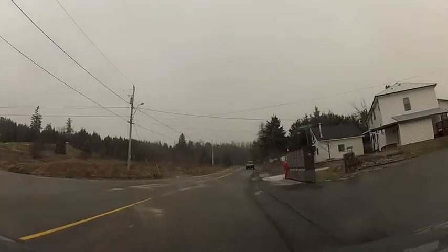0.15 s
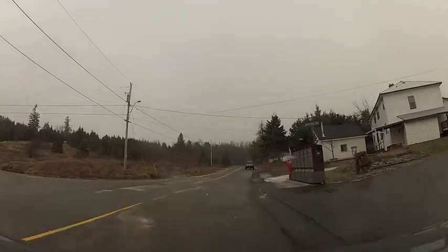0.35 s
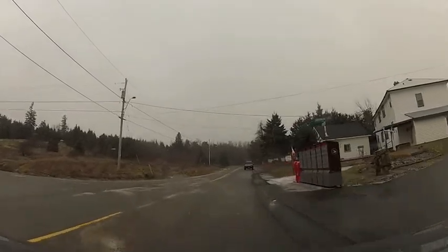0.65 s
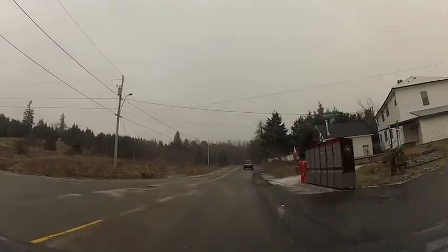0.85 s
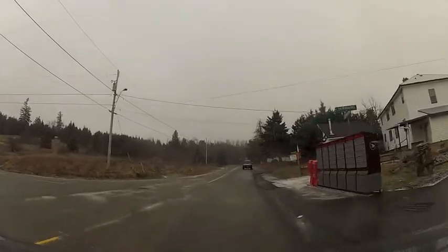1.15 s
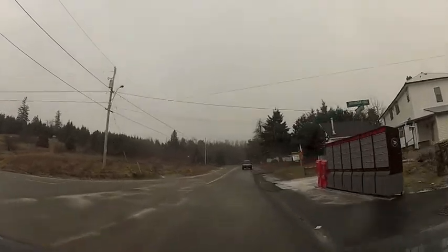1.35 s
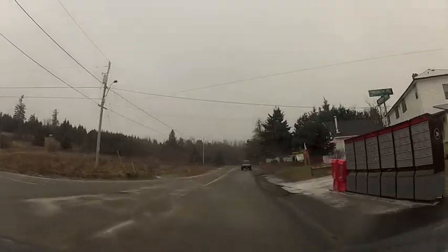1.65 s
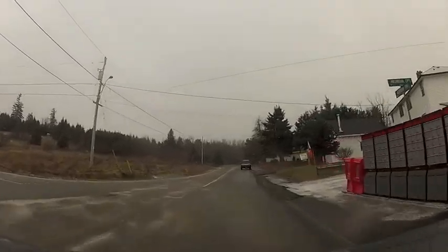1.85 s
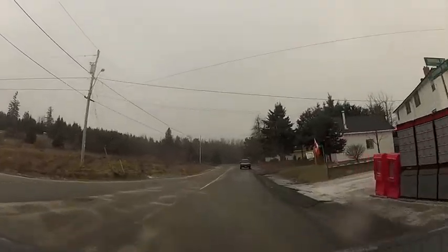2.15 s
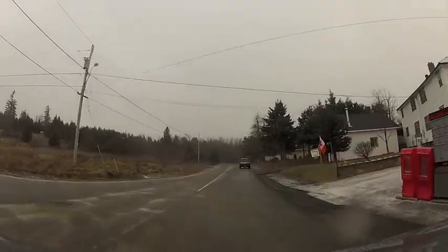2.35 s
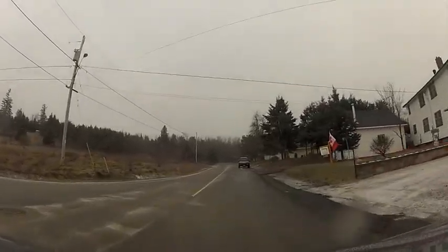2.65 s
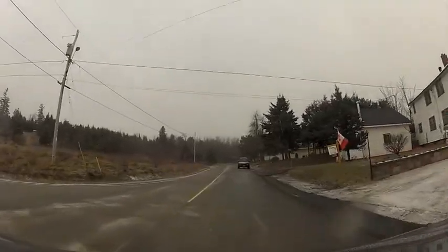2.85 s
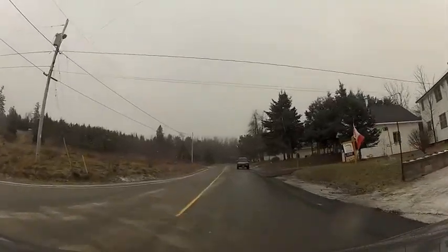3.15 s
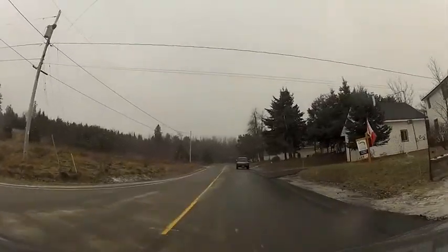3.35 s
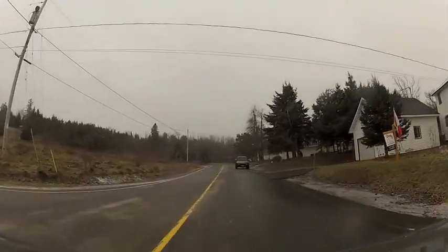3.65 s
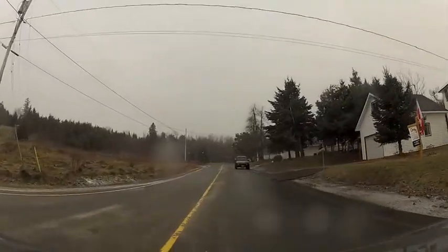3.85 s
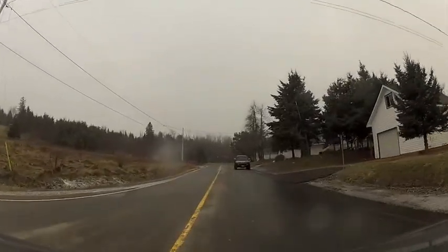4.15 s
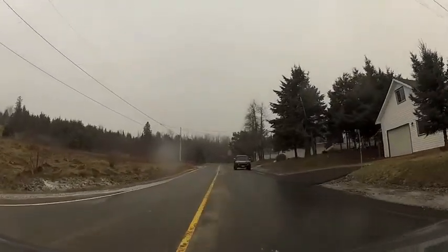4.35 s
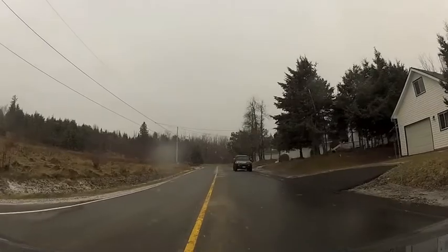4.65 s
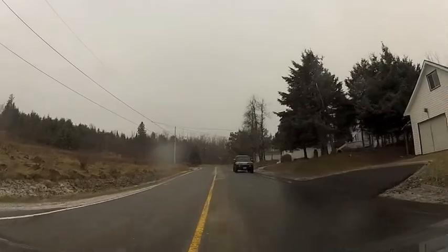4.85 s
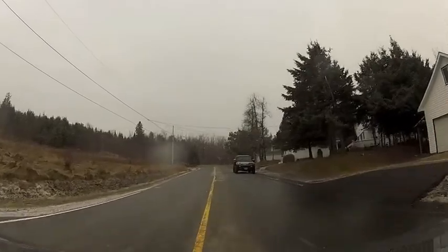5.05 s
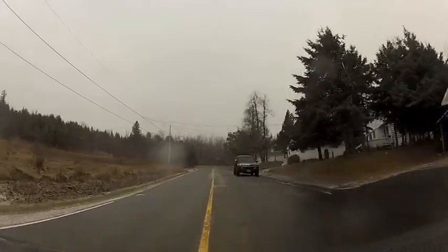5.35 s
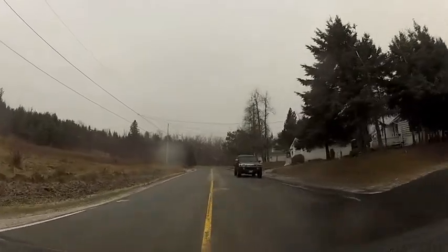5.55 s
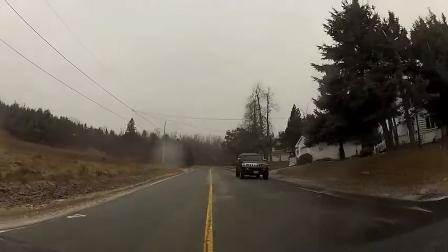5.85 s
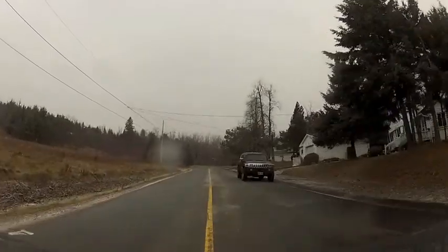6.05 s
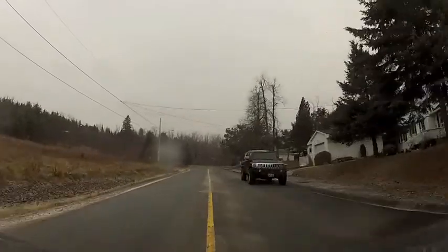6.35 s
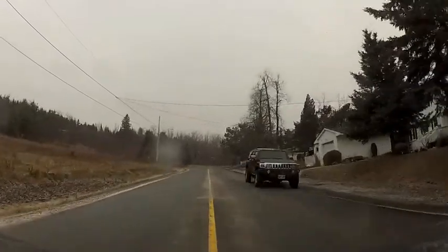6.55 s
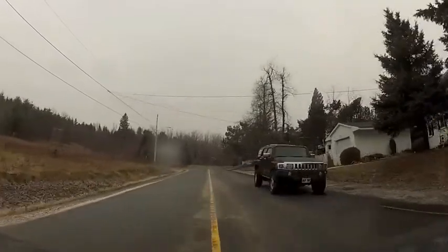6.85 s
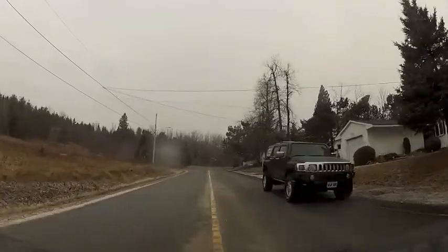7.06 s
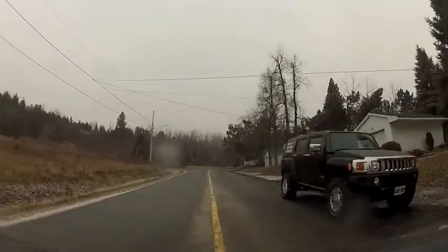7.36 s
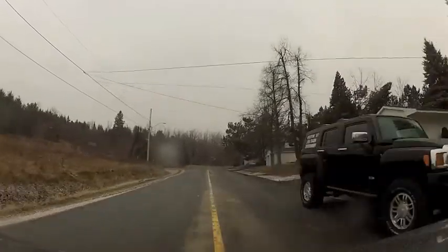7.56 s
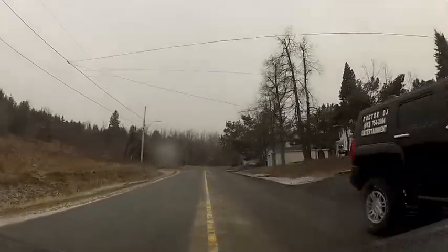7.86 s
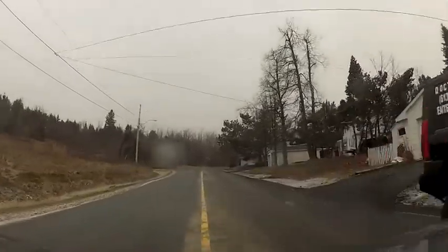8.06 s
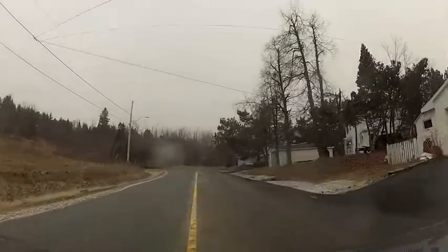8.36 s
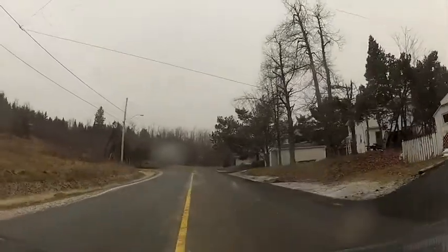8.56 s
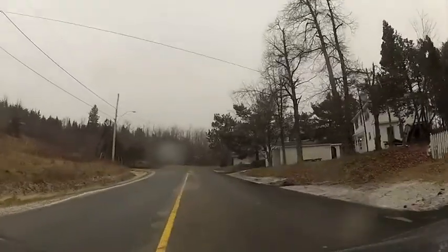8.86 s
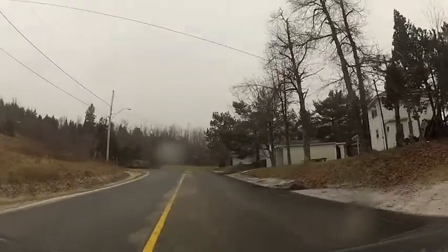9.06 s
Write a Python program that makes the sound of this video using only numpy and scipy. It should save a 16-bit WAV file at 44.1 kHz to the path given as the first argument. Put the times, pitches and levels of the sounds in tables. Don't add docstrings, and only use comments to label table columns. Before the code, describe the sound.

A close, lo-fi microphone in a case on a car's hood hears the engine in light rain on a wet road. For the first second the engine throbs low and quiet over rumbling body shake, with small rain ticks. Around 1 s the throttle opens and the pitch climbs quickly, booming through the metal until about 2.1 s. At 2.3 s a gear change brings a brief jolt and a sharp fall in pitch. From 2.6 s the engine climbs more slowly, growing fuller, and by about 5.5 s settles into a steady, heavy drone with rattling metallic clatter that lasts to the end at 9.2 s. Soft wet tyre hiss grows with speed, and bumps thud low near 4.2 and 6 s. Crisp drops tap the case throughout, a hard one at 4.7 s, then denser and louder from 7 s, especially 8 to 9 s. Treble is grainy and brittle.

```python
import sys
import numpy as np
from scipy import signal
from scipy.fft import rfft, irfft, next_fast_len
from scipy.io import wavfile
from scipy.ndimage import uniform_filter1d, map_coordinates

SR = 44100
rng = np.random.default_rng(int(sys.argv[2]) if len(sys.argv) > 2 else 0)


def unload_wav(signal):
    wavfile.write(
        sys.argv[1],
        SR,
        np.round(np.clip(np.atleast_2d(signal).T, -1, 1) * 32767).astype(np.int16),
    )


def undo_db(level):
    steps = np.asarray(level, float) / 20
    return 10 ** steps


N = 406602


def unit(x):
    return x / np.sqrt(np.mean(x ** 2) + 1e-20)


def noise():
    return rng.standard_normal(N)


def along(points, hz):
    f, v = np.transpose(points)
    return np.interp(np.log(hz + 1), np.log(f + 1), v)


def curves(rows):
    s, *columns = np.transpose(rows)
    return [np.interp(np.arange(N) / SR, s, column) for column in columns]


def wobble(rate):
    knots = rng.standard_normal(int(N * rate / SR) + 4)
    return map_coordinates(knots, [np.arange(N) * rate / SR])


def swells(rows):
    t = np.arange(N) / SR
    return sum(db * np.exp(-.5 * ((t - s) / half) ** 2) for s, half, db in rows)


def filtered(x, response):
    m = next_fast_len(N + SR // 2)
    return irfft(rfft(x, m) * response(np.fft.rfftfreq(m, 1 / SR)), m)[..., :N]


def coloured(x, spectrum):
    return filtered(x, lambda hz: undo_db(along(spectrum, hz)))


def resonate(x, table):
    def response(f):
        return np.sqrt(sum(undo_db(2 * db) / (1 + (2 * (f - c) / w) ** 2) ** 1.63 for c, w, db in table))
    return unit(filtered(x, response))


# time in seconds, firing rate in Hz.
SPEED = [(0, 27.6), (1.0, 27.6), (1.15, 36.4), (1.35, 40.9), (1.8, 51.3), (2.05, 54.1), (2.19, 51.6),
         (2.34, 41.6), (2.41, 38.1), (2.5, 37.2), (2.61, 39), (2.86, 40.7), (3.73, 48.5), (4.07, 51.2),
         (4.81, 55.3), (5.64, 56.7), (6.95, 55.45), (9.22, 55.5)]


def crank():
    return np.cumsum(uniform_filter1d(curves(SPEED)[0], size=SR // 10, mode="nearest")) / SR


# time in seconds, engine bay roar in dB, throttle in dB.
LOAD = [(0, -39, -24), (.93, -39, -14), (1.05, -33.5, 1), (1.16, -35.5, -8), (1.45, -33.5, 4),
        (1.9, -31, 1), (2.12, -31, 6.5), (2.28, -31.5, -4), (2.55, -32, 0), (2.9, -32.5, 7),
        (3.6, -30.5, -3.5), (4.1, -30.5, 0), (4.55, -29, 5), (5.1, -31, 1), (5.5, -30, -13),
        (6.3, -32, -7.5), (7.0, -31.5, -0.5), (9.22, -31.5, -1)]


def load_db():
    return curves(LOAD)


# time in seconds, half length in seconds, swell in dB.
SHIFT = (2.262, 0.03, 3.5)


def jolt_db():
    return swells([SHIFT])


# Hz, level in dB.
BODY = [
    [(27, -37), (36.5, -35), (39, -28), (41, -22), (47.5, -23), (51, -18), (54, -18.5), (56.5, -15)],
    [(55, -40), (73, -25), (78, -24.5), (83, -27.5), (88, -25), (95, -24), (102, -39.5), (112, -35.5)],
    [(83, -32.5), (110, -36), (122, -40), (142, -40), (150, -36), (157, -33), (164, -33.5), (170, -38)],
]
THROTTLE_SHARE = [0.039, 0.051, 0.29]
# Hz, level in dB.
FLOORPAN = [(100, -14), (165, -8.5), (212, -1), (236, -4.5), (258, -2), (290, -11.5), (318, -9), (336, -15),
            (385, -24)]
# time in seconds, half length in seconds, firing tone change in dB.
SURGES = [
    (1.2, 0.23, -5),
    (2.27, 0.034, 6.5),
    (2.52, 0.061, -6),
    (2.75, .06, 2),
    (4.12, .08, 0),
    (4.5, 0.07, 2),
]


def boom():
    upper_db = -39.5
    thin_db_per_hz = 0.33
    throttle_db = load_db()[1]
    turns = crank()
    rate_hz = SR * np.gradient(turns)
    below_cruise_hz = SPEED[-1][1] - rate_hz
    jolt = 0.26 * jolt_db()
    total = np.zeros(N)
    for order in range(1, 8):
        above_first = order - 1
        if order <= 3:
            level_db = along(BODY[above_first], order * rate_hz) + THROTTLE_SHARE[above_first] * throttle_db
        else:
            thinning_db = (0.51 + thin_db_per_hz * below_cruise_hz) * (order - 4)
            level_db = upper_db + throttle_db - thinning_db + along(FLOORPAN, order * rate_hz)
        if order == 1:
            level_db = level_db + swells(SURGES)
        level_db = uniform_filter1d(level_db, size=SR // 25, mode="nearest") + jolt
        flicker_db = (.5 + .15 * above_first) * wobble(7)
        tone = np.sin(order * 2 * np.pi * turns - 0.91 * above_first ** 2)
        total += np.sqrt(2) * undo_db(level_db + flicker_db) * tone
    return total


# multiple of firing rate, dB over the other quarter orders.
ORDERS_DB = [(4.5, 1.5), (5.75, 16), (7.25, -3), (7.5, 5.5), (8, 5.5), (9, 9), (9.75, 12), (10, 17),
             (11, 16), (11.25, 0), (12, 18), (14, 12.5), (16, 13), (16.25, 8.5), (17, 9), (19, 6.5),
             (20, 13), (20.75, 6.5), (22, 10.5), (23, 15), (24, 8.5), (25, 3)]


def clatter(turns):
    level_db = 2.0 + 4.7 * rng.standard_normal(4 * 32)
    level_db[:17] = -60
    for order, db in ORDERS_DB:
        level_db[round(4 * order)] = db
    phase = 2 * np.pi * rng.random(len(level_db))
    cycle = irfft(undo_db(level_db) * np.exp(1j * phase), 4096)
    return unit(np.interp(turns / 4 % 1, np.arange(4096) / 4096, cycle, period=1))


CYLINDERS = [-2, -11, -5, -7.5]
# Hz, width in Hz, level in dB.
BAY_MODES = [(158, 85, -0.5), (219.7, 14, 1), (245, 31, -6), (291, 36, -21), (428, 57, -10.5),
             (505.4, 45, 0), (547, 105, -3), (626, 50, -2.5), (702, 86, -0.5), (761, 43, 2), (817, 67, -4),
             (878.5, 27.5, 2), (939, 33, -1.5)]
# Hz, width in Hz, level in dB.
HIGH_MODES = [(1050, 108, -1.5), (1177, 66, -2.5), (1298, 60, 1), (1390, 57, -3), (1455, 95, -5),
              (1618, 140, -11)]
# Hz, width in Hz, level in dB.
WHIRR = [(932, 45, 6), (956, 20, -3)]


def engine_bay():
    turns = crank() + 0.0026 * wobble(25)
    roar_db, throttle_db = load_db()
    strength = undo_db(np.take(CYLINDERS, turns.astype(int) % 4))
    gas = (1 + 0.81 * strength * np.exp(-3.2 * (turns % 1))) * noise()
    blows = clatter(turns)
    clean = np.clip((curves(SPEED)[0] - 17) / 75, 0, 1)

    def ringing(table, share):
        return np.sqrt(share) * resonate(blows, table) + np.sqrt(1 - share) * resonate(gas, table)

    hood = ringing(BAY_MODES, clean)
    block = undo_db(-13.5 + 0.12 * throttle_db) * ringing(HIGH_MODES, 0.75 * clean)
    whirr = undo_db(-49.5) * resonate(noise(), WHIRR)
    return undo_db(roar_db + jolt_db() + 0.5) * (hood + block) + whirr


# Hz, level in dB per Hz.
SHAKE = [(10, -50), (19, -11), (28, -25), (42, -1.5), (60, -10), (69, 1), (76, 4), (84, 1.5), (93, -9.5),
         (104, -17.5), (148, -17.5), (200, -45), (340, -34), (900, -120)]
# time in seconds, half length in seconds, added shake in dB.
ROUGH_ROAD = [(0, 0.38, 4), (2.303, 0.16, 3.5), (2.997, 0.42, 2), (4.22, 0.036, 8.5), (4.75, 0.1, 3.5),
              (5.7, 0.27, 3.5), (6.003, 0.054, 7), (6.4, 0.27, 3), (7.15, .2, 4.5), (7.7, 0.12, 3.5),
              (8.55, .12, 3.5), (8.8, .1, 3.5), (9.08, 0.08, 5)]
# time in seconds, level in dB.
ROAD = [
    (0.0, -59),
    (0.72, -60.5),
    (1.74, -50.5),
    (2.52, -52.5),
    (4.36, -48),
    (5.55, -47),
    (6.37, -49.5),
    (6.96, -48),
    (9.22, -49),
]
# Hz, level in dB per Hz.
HISS = [(1000, -50), (1500, -14), (1750, 3.5), (1900, 2), (2300, -7), (2900, -15), (3100, -16), (3450, -9),
        (3700, -23), (4400, -41)]


def road():
    shake_db = -32.5 + swells(ROUGH_ROAD)
    shake = unit(coloured(noise(), SHAKE))
    power = abs(uniform_filter1d(shake ** 2, size=SR // 6))
    shake /= np.sqrt(power + .05) ** 0.77
    hiss = undo_db(curves(ROAD)[0] + 0.99 * wobble(30)) * unit(coloured(noise(), HISS))
    return undo_db(shake_db + 2.04) * unit(shake) + hiss


# time in seconds, half length in seconds, drop level change in dB.
SQUALLS = [
    (.2, .2, 6),
    (.62, 0.072, -4),
    (2.6, 0.17, -1.5),
    (3.95, 0.11, 6),
    (5.69, .08, -14),
    (6.06, 0.11, 5),
    (7.1, 0.12, 3.5),
    (8.8, 0.08, 7.5),
]


def unplaced_drops():
    when, soft, pitch = rng.random((1000, 3)).T
    faint = np.c_[when * N / SR, -50 + 11 * when ** .5 - 16 * soft ** .7, 1750 + 1900 * pitch ** 1.5]
    when, soft, pitch = rng.random((110, 3)).T
    pace_db = np.interp(when * N / SR, *np.transpose(ROAD)) - ROAD[-1][1]
    stray_db = -35 + 1.6 * pace_db - 8 * soft
    stray = np.c_[when * N / SR, stray_db, 1800 + 1700 * pitch ** 2.5]
    drops = np.r_[stray, faint]
    drops[:, 1] += swells(SQUALLS)[(drops[:, 0] * SR).astype(int)]
    return drops


# time in seconds, peak in dB, ring in Hz.
EARLY_DROPS = [(0.0093, -38, 1650), (0.0723, -39, 3570), (0.2105, -39, 3230), (0.3119, -36, 1870),
               (0.3431, -41, 2630), (0.4305, -34, 2390), (0.5137, -39, 1720), (0.7593, -34, 2700),
               (0.8009, -41, 3450), (0.8993, -47, 1960), (0.9544, -28.5, 2400), (0.9917, -38, 2710),
               (1.3202, -32.5, 2020), (1.38, -33, 1710), (1.47, -35, 2350), (1.8358, -33, 2170),
               (1.8579, -34, 2000), (1.897, -31, 2870), (2.2282, -35, 2000), (2.4635, -37.5, 2000),
               (2.5917, -38, 2280), (2.9101, -30, 3470), (3.1711, -29, 2190), (3.2018, -40, 2000),
               (3.3549, -36, 2150), (3.5917, -38, 2020), (3.7414, -35, 2370)]
# time in seconds, peak in dB, ring in Hz.
DROPS = [(3.876, -25.5, 1870), (4.0528, -35.5, 1980), (4.1587, -31, 2000), (4.49, -30, 1980),
         (4.541, -33, 2130), (4.7186, -17.5, 2020), (4.8065, -29.5, 2020), (4.98, -26, 2050),
         (5.121, -30, 2020), (5.1524, -29.5, 2070), (5.5595, -25, 1990), (5.8097, -41, 2070),
         (5.9293, -24.5, 2000), (6.02, -27, 2020), (6.1192, -33, 1960), (6.175, -27, 2110),
         (6.5123, -27, 1600), (6.6043, -30, 2070), (7.1024, -23, 1950), (7.1525, -32, 2070),
         (7.287, -29, 1950), (7.417, -30.5, 2150), (7.721, -26, 2050), (7.918, -26, 1730),
         (8.0788, -22, 2030), (8.3087, -23.5, 1920), (8.4052, -22.5, 1950), (8.477, -28, 2020),
         (8.6449, -18.5, 2000), (8.8655, -21.5, 2020)]
# time in seconds, peak in dB, ring in Hz.
RIM_DROPS = [(4.1144, -32, 2700), (4.2218, -28, 2880), (4.9227, -37, 2650), (5.2737, -34.5, 2820),
             (5.3876, -33, 2330), (5.5016, -36, 3470), (5.9826, -39, 3470), (6.0086, -28, 2390),
             (6.097, -30, 2370), (6.129, -33, 2870), (6.525, -31, 3400), (6.8516, -33, 3500),
             (6.971, -33, 2290), (7.0948, -27, 2450), (7.1059, -25.5, 2770), (7.5182, -33, 2300),
             (7.6832, -34, 2920), (7.7688, -29, 2230), (7.8006, -28.5, 3600), (8.0508, -31, 3450),
             (8.091, -26, 2130), (8.1553, -29, 3490), (8.2783, -26, 2330), (8.4136, -35, 3290),
             (8.7472, -25.5, 2250), (8.7795, -32, 2370), (8.9125, -33, 3270), (9.0888, -31, 2070),
             (9.1076, -32, 2710)]
# Hz, level in dB per Hz.
CASE = [(600, -65), (1300, -0.5), (1900, 5), (2600, 7.5), (3050, 1.5), (3450, 7), (3800, -2.5), (4400, -67)]


def rain():
    s, db, hz = np.r_[EARLY_DROPS, DROPS, RIM_DROPS, unplaced_drops()].T[..., None]
    t = np.arange(SR // 60) / SR

    def decay(t60_s):
        return undo_db(-60 * t / t60_s)

    ring = np.sin(2 * np.pi * hz * t) * decay(0.0073) * undo_db(-0.88 * along(CASE, hz))
    splash = rng.standard_normal((len(s), len(t))) * (.5 * decay(.006) + .2 * decay(.03))
    splash = splash * undo_db(-.3 * (db + 36))
    snap = 0.75 * decay(0.0017) * np.cos(2 * np.pi * 1.096 * hz * t)
    tap = (1 - np.exp(-t / .0003)) * (ring + splash) + snap
    start = np.round((s - .0002) * SR).astype(int).clip(0)
    at = (start + np.arange(len(t))).ravel()
    taps = np.bincount(at, (undo_db(db + 7.5) * tap).ravel(), N + SR)[:N]
    return coloured(taps, CASE)


def scene():
    return (boom() + engine_bay() + road() + rain())[None]


def low_pass(x):
    return signal.sosfilt(signal.butter(12, 15820, fs=SR, output="sos"), x)


# Hz, level in dB.
ROLLOFF = [(20, 2), (3500, -1.5), (3620, 1), (3730, -0.5), (3960, 8), (4200, -20), (4600, -72)]
# Hz, level in dB.
TOP = [(20, -1), (11000, 0), (14900, -3), (15250, -13), (15500, -32), (15800, -52)]


def record(dry):
    slow = signal.resample_poly(coloured(dry, ROLLOFF), 80, 441, axis=1)
    held = signal.resample_poly(np.repeat(slow, 6, axis=1), 147, 160, axis=1)
    held = np.pad(held, ((0, 0), (0, 8)))[:, :N]
    return low_pass(coloured(held, TOP))


dry = scene()
out = record(dry)
unload_wav(out)
```